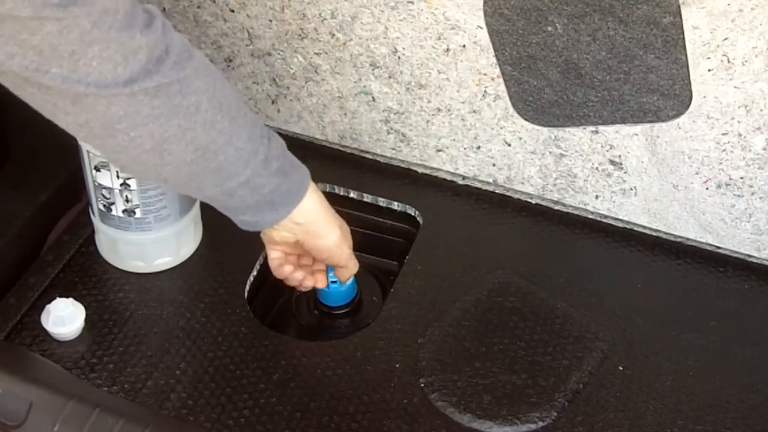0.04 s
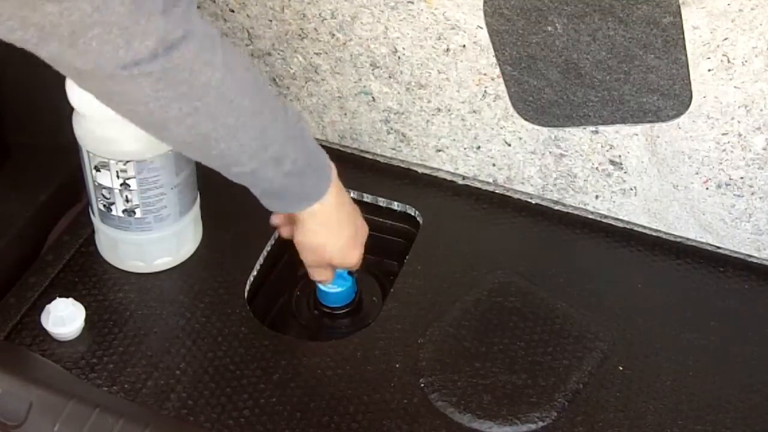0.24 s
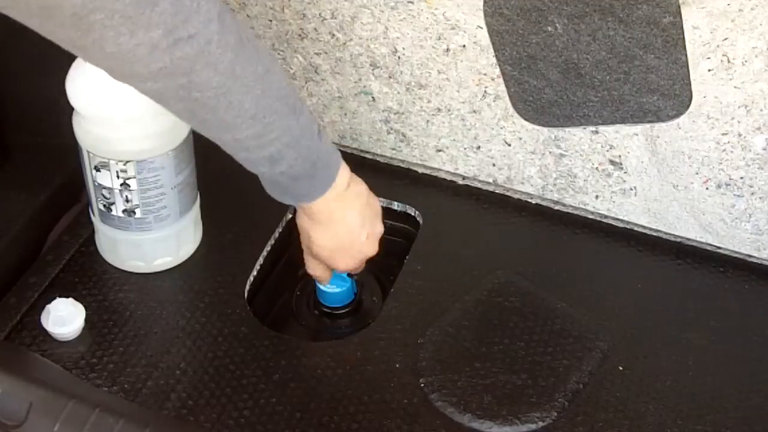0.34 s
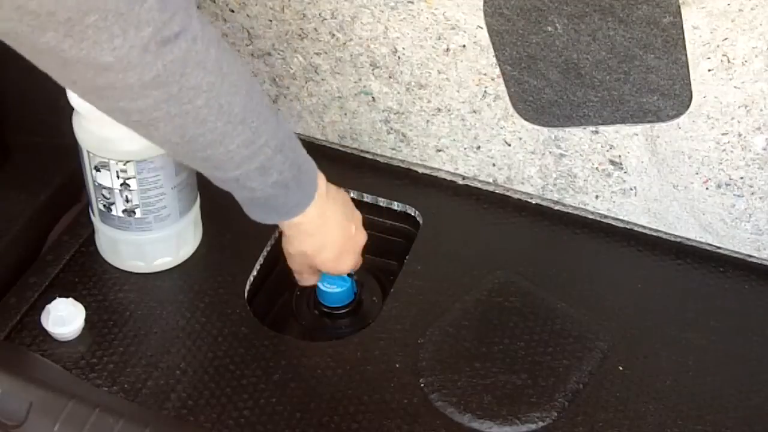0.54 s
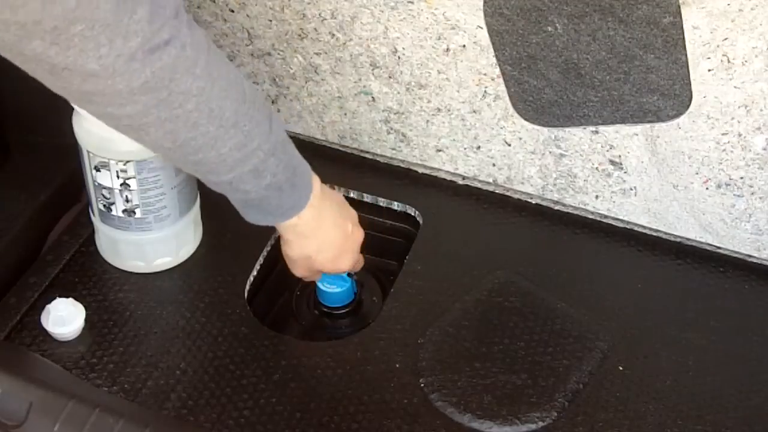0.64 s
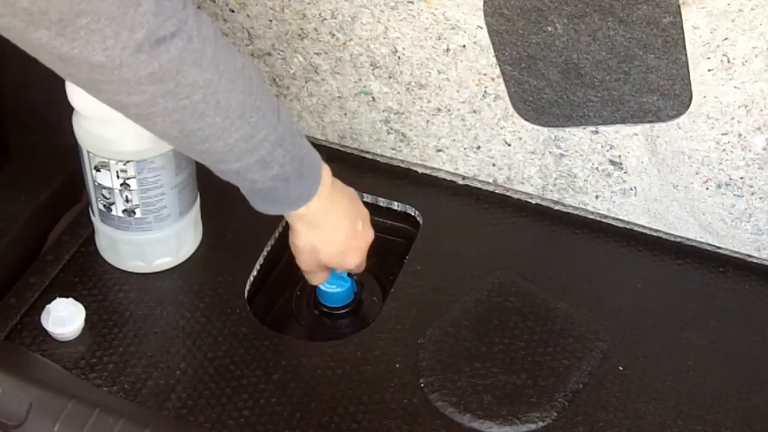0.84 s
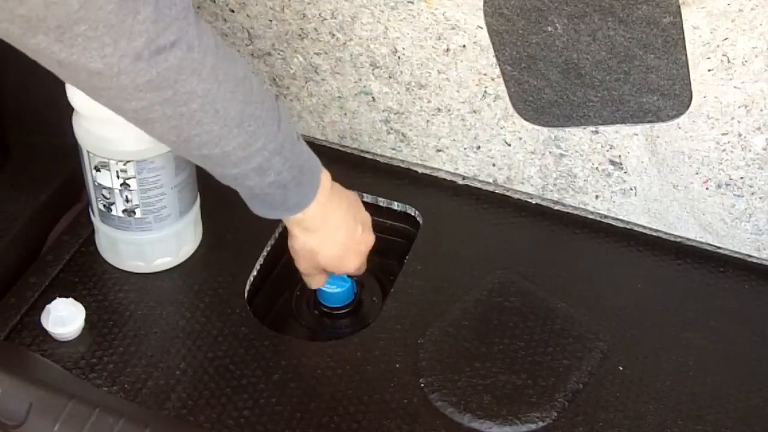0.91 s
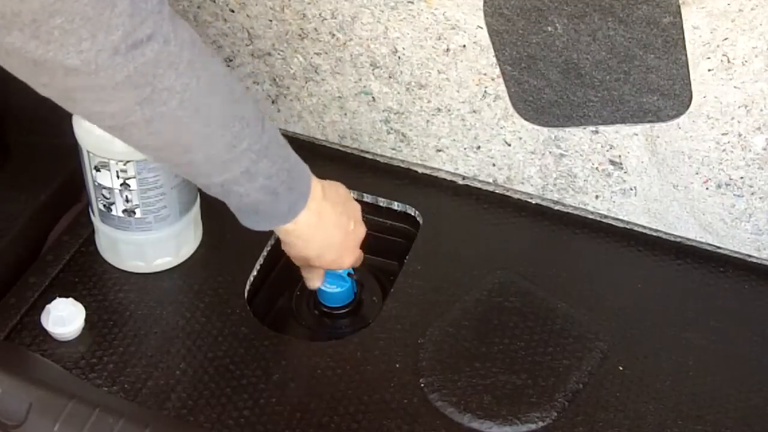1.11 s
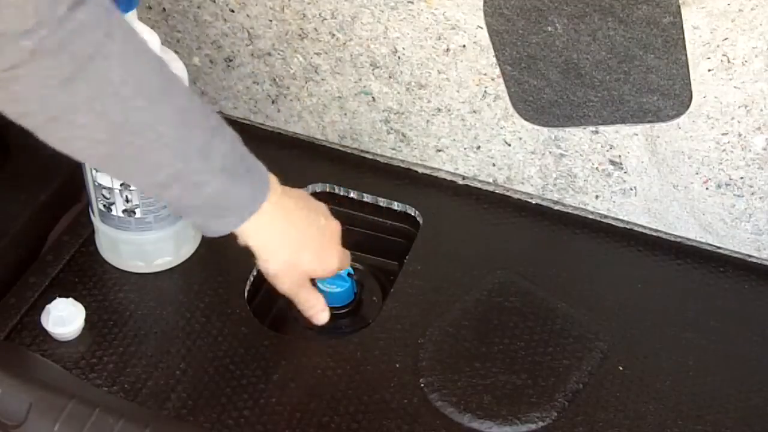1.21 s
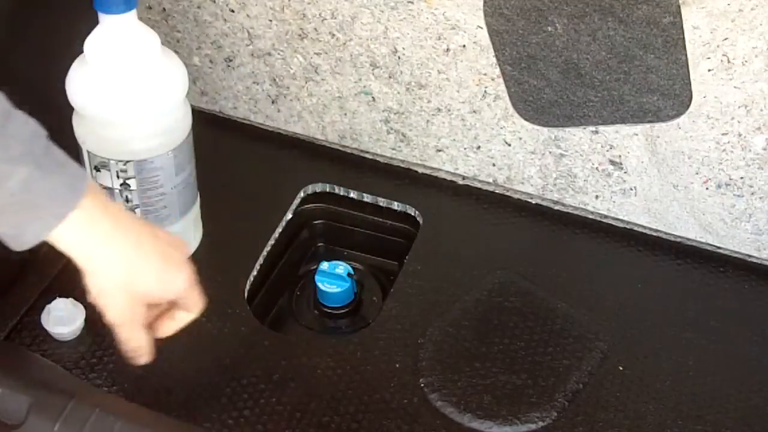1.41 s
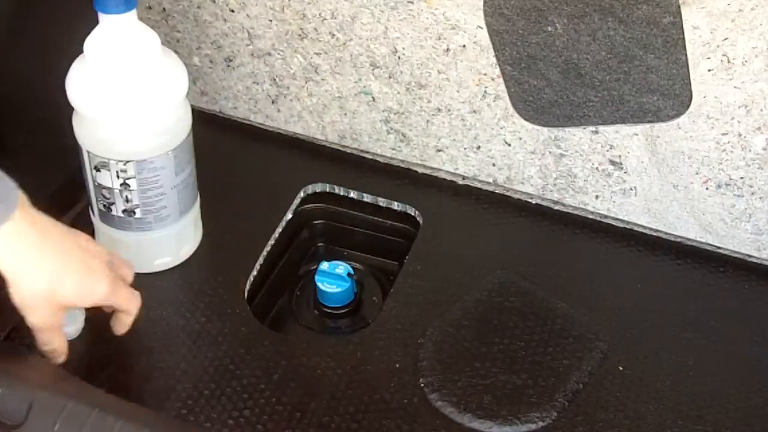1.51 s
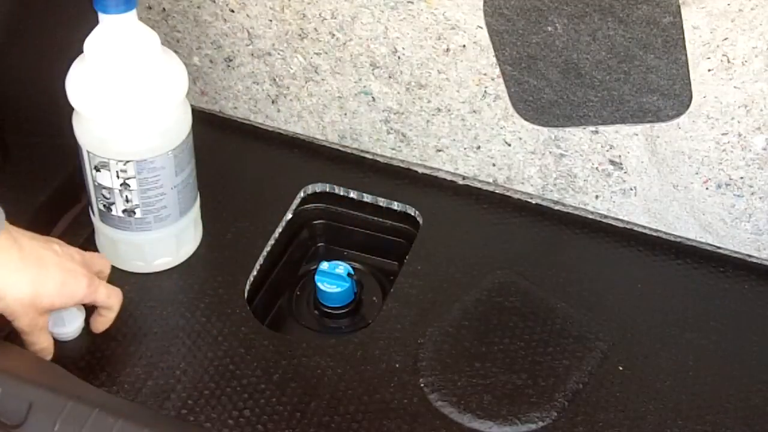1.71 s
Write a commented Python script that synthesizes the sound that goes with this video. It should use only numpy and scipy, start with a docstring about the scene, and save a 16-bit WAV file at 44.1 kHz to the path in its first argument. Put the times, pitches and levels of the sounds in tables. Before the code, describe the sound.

A plastic cap is twisted tight inside a vehicle, heard close. A hand knocks it, then it rasps, squeaks briefly and clicks to a stop. Light finger taps and faint rubbing follow over a low rumble.

```python
"""Inside a vehicle, one microphone close to a plastic cap sunk in the floor, over a low rumble.
A hand grips the cap and knocks the tank. Twisted tight, the cap sticks and slips on its neck in a
short rasp that locks into a squeak and breaks up again, until it clicks against its stop.
As the hand lets go, the palm rubs, a sleeve brushes and fingers tap the plastic."""
import sys
import numpy as np
from scipy import signal
from scipy.fft import rfft, irfft, next_fast_len
from scipy.io import wavfile

SR = 44100
rng = np.random.default_rng(int(sys.argv[2]) if len(sys.argv) > 2 else 0)


def master_out(mix):
    """Clip the mix to full scale and print it as 16-bit PCM to the path in sys.argv[1]."""
    frames = np.transpose(np.atleast_2d(mix))
    ceiling = np.clip(frames, -1, 1)
    pcm = np.round(ceiling * 32767).astype(np.int16)
    wavfile.write(sys.argv[1], SR, pcm)


N = 77175
TIME = np.arange(N) / SR

# The twist of the cap. Each row: time in seconds, slips per second, timing scatter in cycles,
# weakness of every second slip from 0 to 1.
TWIST = [(.255, 760, 0.28, 0.1), (.30, 800, .3, 0.29), (.325, 1200, .24, 0.55), (.362, 1290, 0.19, 0.76),
         (.374, 1312, 0.046, 0), (.387, 1305, 0.11, 0), (.398, 1235, 0.045, 0.2), (.411, 1230, .3, 0.74),
         (.428, 1105, .19, 0.24), (.448, 1056, .25, 0.35)]
# The colour of the plastic cap. Each row: frequency in Hz, gain in dB.
CAP_COLOUR = [(150, -14), (400, -8), (600, -2.5), (900, -3.5), (1250, 8), (1480, -3.5), (1850, 4),
              (2300, 3), (2950, -10.5), (4200, -1.5), (5200, -8.5), (6500, 1), (7600, -6), (10000, -19.5),
              (12500, -35.5), (15000, -59)]


def amp(db):
    """Decibels to gain."""
    return 10 ** (np.asarray(db) / 20)


def unit(x):
    """Scales to rms 1."""
    return x / np.sqrt(np.mean(x ** 2) + 1e-20)


def curve(rows, column=1, outside=None):
    """One column of a timed table at every sample."""
    rows = np.array(rows)
    return np.interp(TIME, rows[:, 0], rows[:, column], outside, outside)


def level(rows):
    """Gain along a dB curve, silent beyond its ends."""
    return amp(curve(rows, outside=-np.inf))


def read(points, hz):
    """A table's value at the given frequencies, interpolated on a log axis."""
    f, value = np.transpose(points)
    return np.interp(np.log(hz + 1), np.log(f), value)


def colour(x, db_at):
    """Minimum-phase filter with the gain db_at(Hz)."""
    size = 2 * next_fast_len(N)
    hz = abs(np.fft.fftfreq(size, 1 / SR))
    log_gain = np.log(amp(np.maximum(db_at(hz), -100)))
    response = np.exp(np.conj(signal.hilbert(log_gain)))[:size // 2 + 1]
    return irfft(rfft(x, size) * response, size)[..., :N]


def wander(top_hz):
    """Slow random motion, rms 1."""
    slow = np.fft.rfftfreq(N, 1 / SR) < top_hz
    return unit(irfft(rfft(rng.standard_normal(N)) * slow, N))


def ring(x, modes):
    """Rings decaying modes with x."""
    response = sum(amp(db - 60 * TIME / t60) * np.cos(2 * np.pi * hz * TIME) for hz, db, t60 in modes)
    return signal.fftconvolve(x, response)[:N]


def burst(start, decay_s):
    """A brief contact: dying noise of energy 1."""
    x = rng.standard_normal(N) * (TIME >= start) * np.exp(-abs(TIME - start) / decay_s)
    return x / np.linalg.norm(x)


def background():
    """The bed of the cabin: a wavering low rumble thinning into hiss, with two faint whirs."""
    # The rumble's colour. Each row: frequency in Hz, relative level in dB.
    rumble_colour = [(12, -38), (20, 1.5), (49, 1.5), (70, -3), (124, -4.5), (160, -10.5), (294, -13.5),
                     (319, -19), (409, -18.5), (484, -24), (1020, -30.5), (1420, -37.5), (2280, -43),
                     (3970, -47), (5380, -52.5), (6530, -44), (15000, -59)]
    # Narrow bands of noise. Each row: centre in Hz, width in Hz, level in dB.
    whir_bands = [(2255, 230, -66.5), (3083, 54, -69.5)]
    rumble_db, waver_db = -31.5, 1
    noise = rng.standard_normal(N) * amp(waver_db * wander(18))
    rumble = amp(rumble_db) * unit(colour(noise, lambda hz: read(rumble_colour, hz)))
    whirs = sum(amp(db) * unit(wander(width / 2) * np.cos(2 * np.pi * hz * TIME))
                for hz, width, db in whir_bands)
    return rumble + whirs


def cabin(x, tail_db=-13):
    """The direct sound plus the cabin's short tail, which dies fastest in the treble."""
    # The cabin's decay. Each row: frequency in Hz, seconds to fall 60 dB.
    decay_times = [(150, 0.6), (1000, 0.085), (2500, 0.072), (7000, 0.053), (14000, 0.02)]
    hz, t, spectra = signal.stft(rng.standard_normal(SR // 2), SR, nperseg=256)
    fade = amp(-60 * t / read(decay_times, hz)[:, None])
    tail = signal.istft(spectra * fade, SR, nperseg=256)[1]
    return x + amp(tail_db) * signal.fftconvolve(x, tail / np.linalg.norm(tail))[:N]


def sleeve(flutter_db=1.5):
    """Cloth brushing, faint and slightly uneven."""
    # The sleeve's strokes. Each row: time in seconds, level in dB.
    strokes = [(.45, -113), (.57, -58.5), (.77, -72), (.89, -59), (1.03, -67), (1.25, -59.5), (1.33, -66),
               (1.54, -54.5), (1.67, -69), (1.75, -65)]
    # The cloth's colour. Each row: frequency in Hz, relative level in dB.
    cloth_colour = [(300, 12), (1200, -26), (2300, -15), (4000, 1.5), (7000, 0.5), (10000, -13),
                    (15000, -17)]
    brushing = unit(colour(rng.standard_normal(N), lambda hz: read(cloth_colour, hz)))
    return level(strokes) * brushing * amp(flutter_db * wander(60))


def palm():
    """Dull rubbing of skin on plastic."""
    # The palm sliding off the cap. Each row: time in seconds, level in dB.
    slide = [(.438, -60), (.45, -28.5), (.48, -36), (.52, -56), (.56, -39.5), (.66, -46.5), (.78, -47.5),
             (.95, -56.5)]
    # The rub's colour. Each row: frequency in Hz, relative level in dB.
    skin_colour = [(100, -5.5), (260, 1.5), (500, -1.5), (900, -13), (2000, -31), (8000, -57)]
    return level(slide) * unit(colour(rng.standard_normal(N), lambda hz: read(skin_colour, hz)))


def fingers(decay_s=.0018, width_octaves=1.1, top_hz=2800):
    """Soft, dull taps on the plastic as the hand lets go."""
    # Finger taps. Each row: start in seconds, level in dB, centre in Hz.
    taps = [(.535, -16, 1200), (.554, -13, 1290), (.584, -13, 1050), (.885, -16, 1100),
            (1.0712, -5.5, 1150), (1.276, -13, 1400), (1.7145, -8, 2700)]

    def tap_db(hz, centre):
        octaves = np.log2((hz + 1) / centre)
        band_db = -20 * np.log10(1 + (octaves / width_octaves) ** 2)
        return band_db - 20 * np.log10(1 + (hz / top_hz) ** 2)
    return sum(amp(db) * colour(burst(start, decay_s), lambda hz: tap_db(hz, centre))
               for start, db, centre in taps)


def knocks(click_decay_s=.0047, soft_hz=500):
    """The hand lands on the cap, and later the cap meets its stop: the tank thuds, the cap clicks."""
    # The contacts. Each row: start in seconds, thud level in dB, click level in dB.
    contacts = [(0.2003, -19, -3.5), (0.2051, -26.5, -3.5), (0.2125, -33.5, -35), (0.2169, -33, -34),
                (.4475, -35, -1.5), (.4535, -39.5, -17)]
    # Modes of the knocked tank. Each row: frequency in Hz, level in dB, seconds to fall 60 dB.
    thud_modes = [(62, -5, .12), (160, 2, .14), (190, -2, .09), (345, -2, .05), (400, -7, .07),
                  (560, -1, .06), (640, -8, .04), (1195, -12, .045), (2130, -17, .04)]
    blows, clicks = np.zeros(N), np.zeros(N)
    for start, thud_db, click_db in contacts:
        blows[round(start * SR)] = amp(thud_db)
        clicks += amp(click_db) * burst(start, click_decay_s)
    soft_blows = colour(blows, lambda hz: -10 * np.log10(1 + (hz / soft_hz) ** 2))
    return ring(soft_blows, thud_modes) + colour(clicks, lambda hz: read(CAP_COLOUR, hz))


def cap_wall(x, spread_s=.0028, step_hz=350):
    """Paths through the cap's wall smear each slip: every frequency shifts by its own small time."""
    hz = np.fft.rfftfreq(N, 1 / SR)
    delay = spread_s * np.interp(hz, np.arange(200) * step_hz, rng.random(200) - .5)
    phase = 2 * np.pi * np.cumsum(delay) * SR / N
    return irfft(rfft(x) * np.exp(-1j * phase), N)


def stick_slip(spread_db=2.2, grit_db=-4.5, grit_cycles=.35):
    """The cap sticks and slips: uneven pulses, strong and weak by turns, a puff of grit each cycle."""
    cycles = np.cumsum(curve(TWIST)) / SR
    count = np.arange(1, int(cycles[-1]))
    lateness, strength = rng.standard_normal((N, 2))[count].T
    due = np.searchsorted(cycles, count)
    late_cycles = lateness * curve(TWIST, column=2)[due]
    onsets = np.clip(np.searchsorted(cycles, count + late_cycles), 0, N - 1)
    weakness = np.clip(curve(TWIST, column=3)[due], 0, 1) * (count % 2)
    slips = np.zeros(N)
    slips[onsets] = amp(spread_db * strength) * (1 - weakness)
    grit = unit(rng.standard_normal(N) * np.exp(-(cycles % 1) / grit_cycles))
    return unit(slips) + amp(grit_db) * grit


def rasp(judder_db=1.6, judder_hz=130, low_hz=850):
    """The slips sound the cap and ring the tank; the low end is full at first, then thins."""
    # The force of the slips. Each row: time in seconds, level in dB.
    force = [(.250, -69), (.257, -22), (.265, -20.5), (.270, -29), (.288, -21.5), (.32, -18.5),
             (.366, -17.5), (.373, -20.5), (.396, -23.5), (.402, -17.5), (.413, -16), (.436, -14.5),
             (.445, -18.5), (.452, -54)]
    # Modes of the tank and its neck. Each row: frequency in Hz, level in dB, seconds to fall 60 dB.
    tank_modes = [(542, -43, .1), (766, -39.5, .09), (950, -50, .07), (1082, -48, .07), (1370, -47, .07),
                  (1535, -47, .08), (1672, -52, .1), (1880, -50, .06), (1945, -49, .06), (2198, -59, .23),
                  (4455, -43, .03), (6380, -44, .035), (6940, -43, .035)]
    # The swell and dip below low_hz. Each row: time in seconds, gain in dB.
    low_gain = [(.26, 4), (.31, 6), (.35, 0), (.376, -16), (.41, -7), (.445, -6)]
    plastic = unit(colour(cap_wall(stick_slip()), lambda hz: read(CAP_COLOUR, hz)))
    drive = plastic * level(force) * amp(judder_db * wander(judder_hz))
    body = drive + ring(drive, tank_modes)
    low_end = signal.sosfiltfilt(signal.butter(4, low_hz, fs=SR, output="sos"), body)
    return body + low_end * (amp(curve(low_gain)) - 1)


def squeak():
    """The slips lock into a nearly pure tone at the slip rate."""
    # The squeak's swells. Each row: time in seconds, level in dB.
    swells = [(.365, -34), (.371, -12), (.389, -8.5), (.397, -23), (.402, -11.5), (.407, -11.5),
              (.411, -27), (.432, -23), (.448, -34)]
    # Its harmonics. Each row: multiple of the slip rate, relative level in dB.
    harmonics = [(1, 1.5), (2, -19.5), (3, -19), (5, -28)]
    phase = 2 * np.pi * np.cumsum(curve(TWIST)) / SR
    return level(swells) * unit(sum(amp(db) * np.sin(k * phase) for k, db in harmonics))


def scene():
    """Everything sits dead centre; cap, tank and taps carry the cabin's tail, the rest stays dry."""
    mono = cabin(rasp() + fingers() + squeak() + knocks()) + palm() + sleeve() + background()
    return np.array([mono, mono])


def record(dry):
    """The microphone's own hiss, its narrow treble notch and the band limit."""
    hiss_db, top_hz = -68, 15300
    notch_hz, notch_width_hz, notch_db = 5497, 422, -13.5
    hissy = dry + amp(hiss_db) * rng.standard_normal(dry.shape)
    notched = colour(hissy, lambda hz: notch_db * np.exp(-((hz - notch_hz) / notch_width_hz) ** 2))
    band_limit = signal.firwin(511, top_hz, window=("kaiser", 9), fs=SR)
    return signal.oaconvolve(notched, band_limit[None], "same")


dry = scene()
out = record(dry)
master_out(out)
```